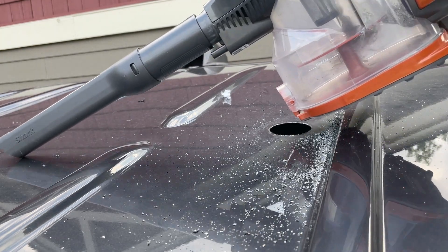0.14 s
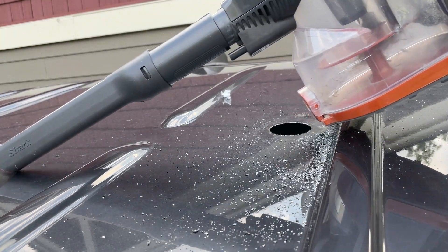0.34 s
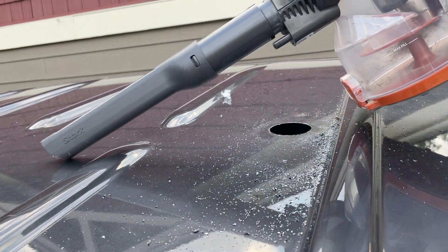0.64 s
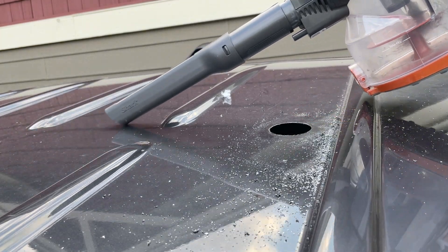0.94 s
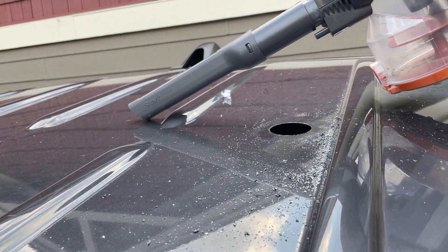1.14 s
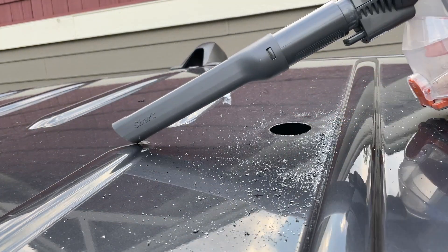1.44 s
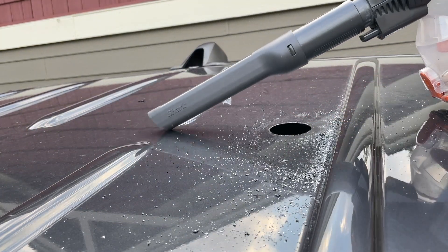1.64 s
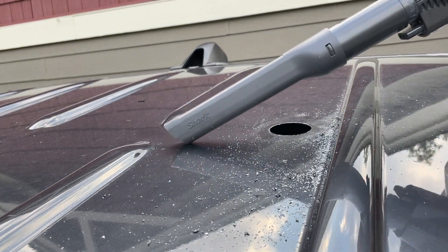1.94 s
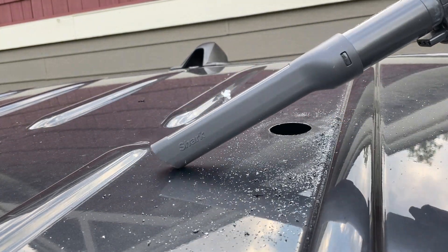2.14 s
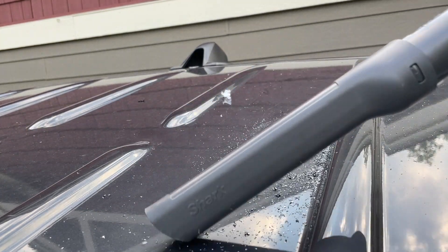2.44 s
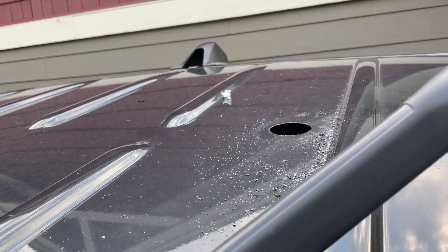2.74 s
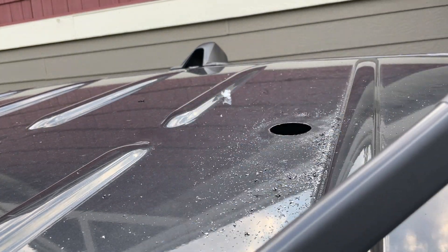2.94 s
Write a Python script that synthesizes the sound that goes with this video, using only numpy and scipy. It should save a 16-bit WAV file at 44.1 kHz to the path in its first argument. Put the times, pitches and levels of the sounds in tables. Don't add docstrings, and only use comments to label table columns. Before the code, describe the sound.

Close outdoor stereo sound of a vacuum cleaner: constant thin motor whine, broad exhaust rush and airy nozzle hiss, a brief low bump with chirping squeaks halfway, then brighter suction as the nozzle swings towards the microphone.

```python
import sys
import numpy as np
from scipy import signal
from scipy.fft import rfft, irfft, next_fast_len
from scipy.io import wavfile

SR = 44100
rng = np.random.default_rng(int(sys.argv[2]) if len(sys.argv) > 2 else 0)


def store_wav(level_fs):
    pcm = np.round(np.clip(np.atleast_2d(level_fs), -1, 1) * 32767)
    wavfile.write(sys.argv[1], SR, pcm.T.astype(np.int16))


def voltage_ratio(level):
    return 10 ** (np.asarray(level, float) / 20)


N = 136710

# time in seconds, bearing from about -1 to 1, low
# notch in Hz, lower and upper edge of the port null in Hz, extra right lag of the 2nd blade tone in rad.
BEARING = [(0, -1.4, 2130, 7750, 9930, 0), (.35, -1, 2170, 7600, 10350, 0.38),
           (.7, -0.72, 2280, 7500, 10000, 0), (.8, -0.86, 2330, 7550, 10100, 0),
           (.86, -0.4, 2360, 8300, 10100, 0.92), (1, -0.45, 2450, 8300, 9700, 0.48),
           (1.24, .1, 2500, 8300, 9700, 0.23), (1.3, -0.15, 2470, 7650, 9700, .25),
           (1.45, 0.27, 2530, 7550, 9000, 0.21), (1.6, 0.28, 2550, 7600, 9150, .5),
           (1.7, 0.47, 2730, 7800, 9700, .35), (2.04, .6, 2810, 7700, 9600, 0.49),
           (2.12, 0.67, 2760, 8300, 9800, .4), (2.36, 0.83, 2700, 7840, 9860, 1.3),
           (2.43, 0.64, 2670, 8000, 10800, 0), (2.62, 1, 2650, 8100, 10500, 0),
           (2.68, 1, 2580, 7940, 9850, 0), (2.86, 0.94, 2660, 8000, 9400, 0),
           (3.1, 0.84, 2650, 8000, 9000, 0)]
# time in seconds, then exhaust, wand, nozzle hiss and fine leak hiss in dB.
AIR = [(0, -21.5, -30.5, -30, -36), (0.25, -23, -29.5, -33.5, -36), (0.55, -24, -31, -32, -37.5),
       (0.72, -25.5, -30, -34.5, -43), (0.95, -24, -30, -30.5, -37.5), (1.27, -24.5, -31, -32, -36.5),
       (1.35, -25.5, -30, -36, -42), (1.39, -22.5, -33, -31, -38), (1.44, -23.5, -33, -31, -41),
       (1.5, -23.5, -33, -29, -39), (1.65, -27, -30, -29.5, -34.5), (1.75, -25, -31, -37, -43),
       (1.85, -26.5, -30.5, -35.5, -38), (2.05, -27.5, -27.5, -35.5, -36.5), (2.115, -29, -29, -30.5, -36),
       (2.2, -29, -27.5, -28.5, -33.5), (2.4, -27, -25.5, -26, -37.5), (2.52, -28.5, -26, -27, -35.5),
       (2.66, -32, -23.5, -23.5, -35), (2.73, -30, -24.5, -28.5, -37), (2.82, -40, -22, -21.5, -30.5),
       (2.93, -36, -22, -24.5, -34.1), (3.0, -32.5, -22, -30, -34), (3.1, -27, -25, -29.5, -29.5)]


def in_time(rows):
    s, *columns = np.transpose(rows)
    return [np.interp(np.arange(N) / SR, s, c) for c in columns]


def at_hz(rows, hz):
    f, *columns = np.transpose(rows)
    return [np.interp(np.log(hz), np.log(f), c) for c in columns]


def rms_one(x):
    return x / np.sqrt(np.mean(np.abs(x) ** 2) + 1e-20)


def drift(rate_hz, order=20):
    r = np.exp(-2 * order * np.pi * rate_hz / SR)
    chance = rng.standard_normal(N // order + 1002)
    slow = signal.lfilter([1], [1, -2 * r, r * r], chance)[1000:]
    return rms_one(slow - slow.mean())


def full(slow, order=20):
    return np.interp(np.arange(N) / order, np.arange(len(slow)), slow)


def ports(wave, lag, pan_db):
    left = wave * np.exp(-.5j * lag) * voltage_ratio(pan_db / 2)
    right = wave * np.exp(.5j * lag) * voltage_ratio(-pan_db / 2)
    return np.real([left, right])


def whine():
    # time in seconds, blade rate in Hz, level of blade, shaft, 2nd and 3rd blade tone in dB, swing 0-1.
    motor = [(0, 4192, -45, -35, -43, -46, 0), (.2, 4193, -42, -33, -40, -50, .05),
             (.5, 4192, -40, -35, -49, -48, .1), (.78, 4192, -44, -36, -43, -45, .12),
             (.95, 4193, -44, -36, -44, -47, .1), (1.12, 4196, -40, -36, -36, -47, .12),
             (1.35, 4196, -41, -36, -33, -53, .25), (1.63, 4194, -38.5, -35, -43, -57, .35),
             (1.9, 4196, -38, -36, -36, -58, .4), (2.1, 4197, -33, -41, -43, -58, .9),
             (2.4, 4196, -33.5, -38, -49, -59, .9), (2.7, 4196, -31.5, -38, -44, -58, 1),
             (3.1, 4192, -33, -39, -47, -61, .9)]
    # left lag in rad and its growth with swing, left-right level in dB and its growth, waver in dB.
    tones = [
        (.5, 1.5, -3, 1.5, 1.3),
        (1.3, 1.4, -3.5, 7, 1.2),
        (2.6, 2.2, 7, -5, 2),
        (-.9, .7, -1.5, 1, .6),
        (3.1, 0, 0, 0, 1.5),
        (-.5, .4, 0, 0, 1),
    ]
    blades = 6
    far_waver_db = 2
    blade_hz, blade, shaft, second, third, swing = in_time(motor)
    shaft_hz = blade_hz / blades * (1 + .0003 * full(drift(20)))
    turn = 2 * np.pi * np.cumsum(shaft_hz) / SR
    leak_lag = in_time(BEARING)[-1]
    multiples = [1, 2, 5, blades, 2 * blades, 3 * blades]
    levels = [shaft, -39.5, -48 - 4 * swing, blade, second, third]
    out = 0
    for multiple, db, (lag, lag_up, pan_db, pan_up, waver_db) in zip(multiples, levels, tones):
        if multiple == blades:
            waver_db = waver_db + far_waver_db * (1 - swing)
        wave = np.sqrt(2) * voltage_ratio(db + waver_db * full(drift(14.0))) * np.exp(1j * multiple * turn)
        tone_lag = lag + lag_up * swing
        if multiple == 2 * blades:
            tone_lag = tone_lag - leak_lag
        out = out + ports(wave, tone_lag, pan_db + pan_up * swing)
    return out


def rush(spectrum, port_rows, pipe, bands, patchy_db, gust_db, gust_hz):
    # frequency in Hz, level in dB.
    shared_dip = [(6500, 0), (7200, -0.5), (7700, -5.5), (8200, 3), (9200, 3), (10300, 0.5)]
    size = next_fast_len(N)
    hz = np.maximum(np.arange(size // 2 + 1) * SR / size, 1)
    lag, alike, pan_db = at_hz(port_rows, hz)
    alike = np.clip(alike, 0, 1)
    colour = voltage_ratio(at_hz(spectrum, hz)[0])
    for peak_hz, width_hz, db in pipe:
        resonance = (voltage_ratio(2 * db) - 1) / (1 + (2 * (hz - peak_hz) / width_hz) ** 2) ** 2
        colour = colour * np.sqrt(1 + resonance)
    mid, side = rfft(rng.standard_normal((2, size)))
    mid, side = np.sqrt(1 + alike) * mid, np.sqrt(1 - alike) * side
    turn = np.exp(.5j * lag) * voltage_ratio(-pan_db / 2)
    pair = colour * np.array([(mid + side) / turn, (mid - side) * turn])
    pair = pair + pair.mean(axis=0) * (voltage_ratio(at_hz(shared_dip, hz)[0]) - 1)
    place = 2 * np.log2(1 + hz / 500)
    gust = gust_db * drift(gust_hz)
    out = 0
    for k in bands:
        share = np.cos(np.pi / 2 * np.clip(place - k, -1, 1)) ** 2
        flicker = patchy_db * (.5 * drift(5.1) + drift(25.5))
        out = out + irfft(pair * share, size)[:, :N] * full(voltage_ratio(gust + flicker))
    return rms_one(out)


def exhaust_rush():
    # frequency in Hz, level in dB per Hz.
    spectrum = [(400, -10.5), (700, 0), (1300, -1.5), (2300, -6.5), (3400, -1.5), (5000, -8.5), (6000, -15),
                (12000, -26)]
    # frequency in Hz, left lag in rad, likeness 0-1, left-right level in dB.
    port_rows = [(494, 0.94, 0.58, -7), (1260, 1.63, 1, -4), (1740, 1.28, 0.3, -1.5), (2030, 2.26, 0, 3),
                 (2750, 3.7, 0.7, 3.5), (3450, 2.93, 0.7, 3.5), (4030, 5.3, 0.48, 0.5),
                 (5060, 6.5, 0.5, 3.5), (5600, 11, 0.8, -3), (6950, 5.8, 0.5, 6), (7640, 9.8, 1, 0),
                 (12500, 13.6, .8, 9)]
    air = rush(spectrum, port_rows, [], range(1, 10), patchy_db=0.77, gust_db=1.2, gust_hz=17.0)
    return voltage_ratio(in_time(AIR)[0] - 3) * air


def wand_air():
    # frequency in Hz, level in dB per Hz.
    spectrum = [(25, -32), (55, -3.5), (110, 1), (160, -6), (350, -0.5), (800, -5), (1700, -16),
                (3000, -12.5)]
    # frequency in Hz, left lag in rad, likeness 0-1, left-right level in dB.
    port_rows = [(50, 0.23, 0.94, 1), (435, -0.37, 0.95, 1.5), (700, 1, 0.3, -1.5), (1090, -0.6, 0.48, 8),
                 (1450, -2, 0.22, 4), (2350, -2.5, 0.28, 1.5)]
    # frequency in Hz, width in Hz, height in dB.
    pipe = [(83, 31, 2), (450, 67, 9.5), (1017, 118, 11.5), (1420, 66, 10.5), (1914, 190, 12),
            (266, 46, 2.5)]
    air = rush(spectrum, port_rows, pipe, range(7), patchy_db=0.68, gust_db=0.2, gust_hz=25.0)
    return voltage_ratio(in_time(AIR)[1] + 1) * air


def nozzle_hiss():
    # frequency in Hz, level in dB per Hz.
    spectrum = [(2000, -18), (4500, -6), (6000, -3.5), (8000, 1.5), (10000, -1.5), (12000, -13),
                (13500, -23)]
    # frequency in Hz, left lag in rad, likeness 0-1, left-right level in dB.
    port_rows = [(2550, 1.9, 0.93, 2.8), (4140, 5.6, 0.67, .5), (5300, 4.8, 1, .8), (5600, 7.58, 0.57, 0.8),
                 (6830, 7.62, 0.9, 0.8), (7900, 8.78, 0.65, .1), (8700, 9.42, 0.97, .1),
                 (10470, 10.44, 0.69, .1), (12500, 12.5, 0.94, .1)]
    air = rush(spectrum, port_rows, [], range(5, 11), patchy_db=1.72, gust_db=1.2, gust_hz=21.2)
    return voltage_ratio(in_time(AIR)[2] - 0.5) * air


def leak_hiss():
    # frequency in Hz, level in dB per Hz.
    spectrum = [(9000, -55), (11500, -2.5), (12600, -4.5), (14300, 2.5), (16000, -3)]
    # frequency in Hz, left lag in rad, likeness 0-1, left-right level in dB.
    port_rows = [(9000, 6.3, .95, .1), (10700, 1.9, .7, .1), (12200, 13.2, 0.83, .1)]
    air = rush(spectrum, port_rows, [], range(9, 12), patchy_db=-0.5, gust_db=1.15, gust_hz=14.0)
    return voltage_ratio(in_time(AIR)[3] + 4) * air


def steer(air):
    # frequency in Hz, lag in rad.
    bearing_lag = [(1700, 0.012), (2400, 1.58), (3800, 1.08), (4600, 0.32), (5600, 0.27), (6800, 0.01)]
    null_db, null_edge_hz, null_flutter_hz = -14.5, 140, 260
    notch_db, notch_width_hz = -2, 240
    shared_notch_db, shared_notch_width_hz = -5, 180
    facing_db, facing_hz, facing_width_hz = -6, 4670, 700
    hz, s, pair = signal.stft(air, SR, nperseg=1024)
    s0, *columns = np.transpose(BEARING)
    bearing, notch_hz, low_hz, high_hz, _ = [np.interp(s, s0, c) for c in columns]
    towards = np.maximum(bearing, 0)
    hz = np.maximum(hz, 1)[:, None]

    flutter_hz = null_flutter_hz * (1.1 - .7 * towards)
    low_hz = low_hz + 80 + flutter_hz * np.interp(s * SR, np.arange(N), full(drift(14)))
    high_hz = high_hz - 20 + flutter_hz * np.interp(s * SR, np.arange(N), full(drift(14)))
    inside = (1 + np.tanh((hz - low_hz) / null_edge_hz)) * (1 + np.tanh((high_hz - hz) / null_edge_hz)) / 4

    turn = np.exp(.5j * at_hz(bearing_lag, hz)[0] * bearing)
    pair = np.array([pair[0] / turn, pair[1] * turn])
    pair = pair * voltage_ratio(notch_db * np.exp(-((hz - notch_hz) / notch_width_hz) ** 2))
    shared_notch = shared_notch_db * np.exp(-((hz - notch_hz) / shared_notch_width_hz) ** 2)
    pair = pair + pair.mean(axis=0) * (voltage_ratio(null_db * inside + shared_notch) - 1)
    facing = facing_db * towards ** 4 * np.exp(-((hz - facing_hz) / facing_width_hz) ** 4)
    pair = pair + (pair - pair.mean(axis=0)) * (voltage_ratio(facing) - 1)
    return signal.istft(pair, SR, nperseg=1024)[1][:, :N]


def bump(start_s, hz, db, t60_s, rise_s):
    t = np.maximum(np.arange(N) / SR - start_s, 0)
    return voltage_ratio(db - 60 * t / t60_s) * (1 - np.exp(-t / rise_s)) * -np.sin(2 * np.pi * hz * t)


def roof_thump():
    return -bump(1.374, 58, -18.5, t60_s=0.13, rise_s=0.0037)


def squeaks():
    # start in seconds, length in seconds, start and end pitch in Hz, level in dB.
    glides = [
        (1.39, .045, 2950, 3420, -28),
        (1.435, 0.034, 3076, 3490, -26),
        (1.48, 0.013, 4000, 4500, -28),
        (1.502, 0.031, 4400, 4080, -21),
        (1.508, 0.027, 3450, 3100, -25),
        (1.524, 0.03, 3580, 3050, -22),
    ]
    breath_hz = 60
    breathy = 1 + .3 * (full(drift(breath_hz)) + 1j * full(drift(breath_hz)))
    out = 0
    for s, length, start_hz, end_hz, db in glides:
        part = np.clip((np.arange(N) / SR - s) / length, 0, 1)
        turn = 2 * np.pi * length * part * (start_hz + (end_hz - start_hz) * part / 2)
        out = out + voltage_ratio(db) * np.sin(np.pi * part) * np.exp(1j * turn)
    return ports(voltage_ratio(-3) * out * breathy, lag=1.6, pan_db=3.0)


def gap_rush():
    start_s, length_s, low_hz, high_hz, level_db = 1.44, .13, 3100, 4800, -33
    part = np.clip((np.arange(N) / SR - start_s) / length_s, 0, 1)
    noise = rng.standard_normal((3, N))
    pair = noise[0] + .8 * noise[1:]
    band_filter = signal.butter(2, [low_hz, high_hz], "band", fs=SR, output="sos")
    band = signal.sosfilt(band_filter, pair)
    return voltage_ratio(level_db) * np.sin(np.pi * part) ** 2 * rms_one(band)


def wand_knock():
    return bump(1.544, 1006, -20.5, t60_s=0.09, rise_s=0.0011)


def scene():
    air = exhaust_rush() + wand_air() + nozzle_hiss() + leak_hiss()
    graze = roof_thump() + squeaks() + gap_rush() + wand_knock()
    return whine() + steer(air) + graze


def roll_off(x):
    return signal.sosfilt(signal.butter(12, 15850, fs=SR, output="sos"), x)


def record(dry):
    size = next_fast_len(N)
    hz = np.maximum(np.arange(size // 2 + 1) * SR / size, 1)
    mid = rfft(dry[0] + dry[1], size) / 2 * (hz < 15750)
    side = rfft(dry[0] - dry[1], size) / 2 * (hz < 12700)
    pair = np.array([mid + side, mid - side]) / (1 + (36 / hz) ** 4)
    mix = irfft(pair, size)[:, :N]
    return roll_off(mix)


dry = scene()
out = record(dry)
store_wav(out)
```